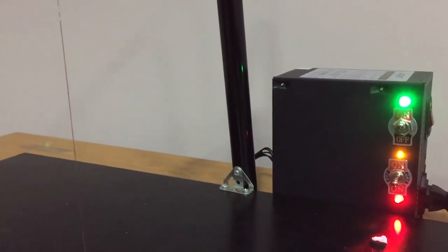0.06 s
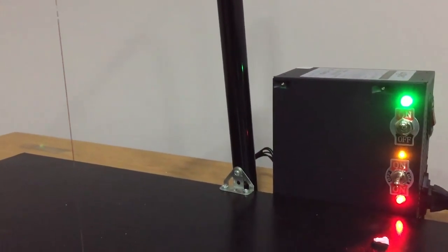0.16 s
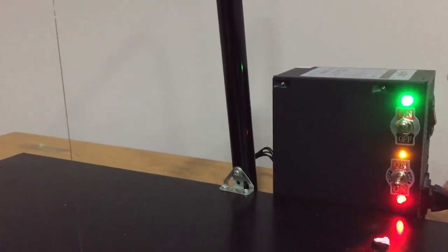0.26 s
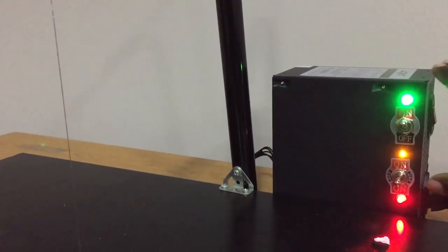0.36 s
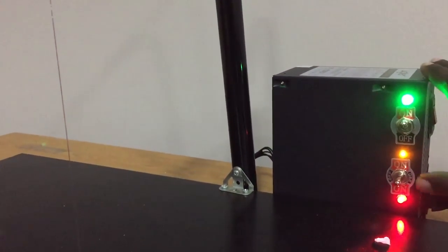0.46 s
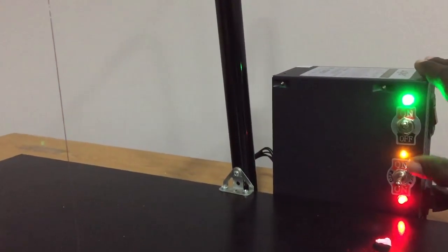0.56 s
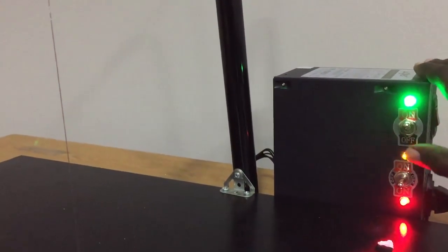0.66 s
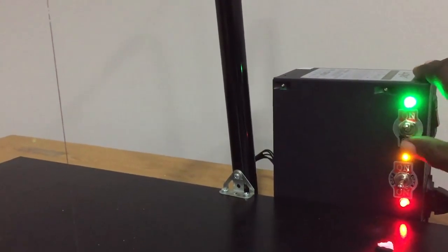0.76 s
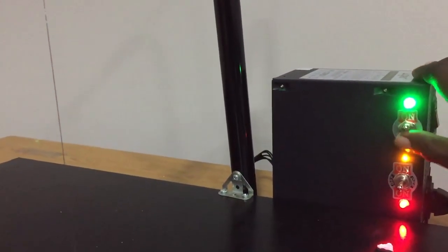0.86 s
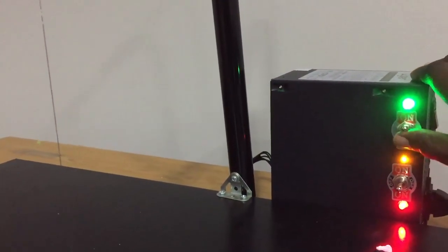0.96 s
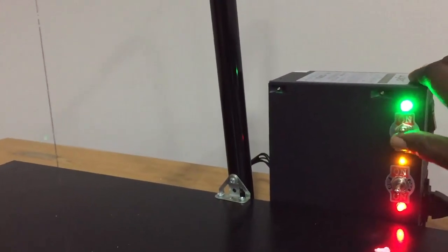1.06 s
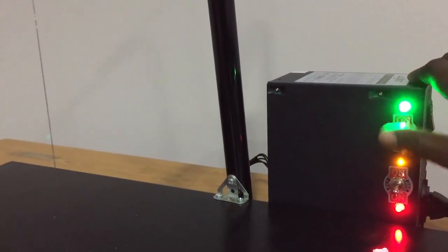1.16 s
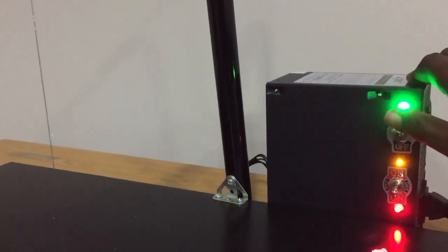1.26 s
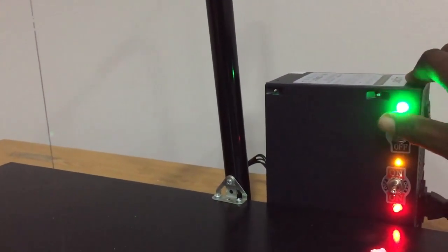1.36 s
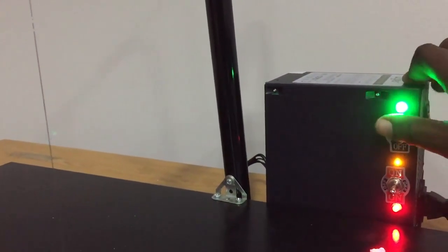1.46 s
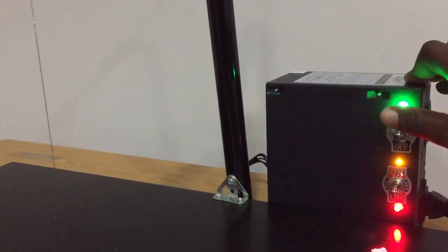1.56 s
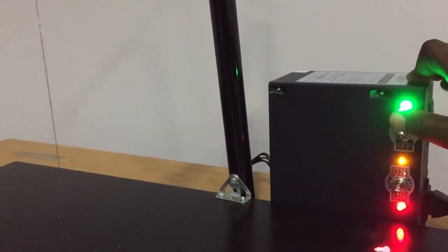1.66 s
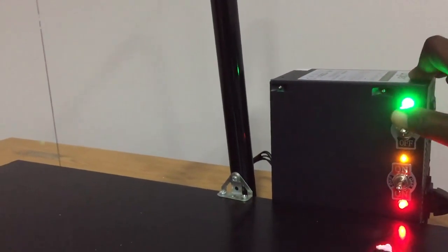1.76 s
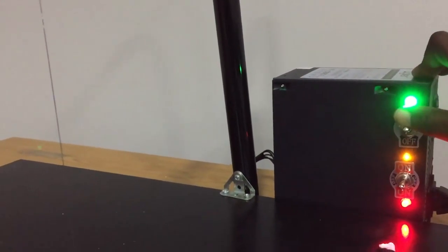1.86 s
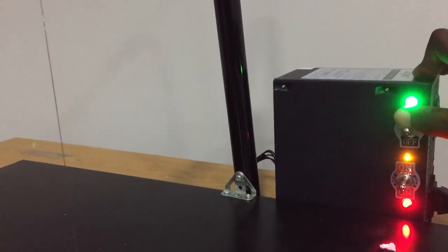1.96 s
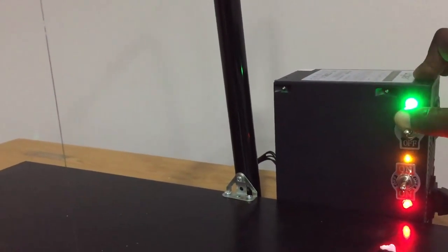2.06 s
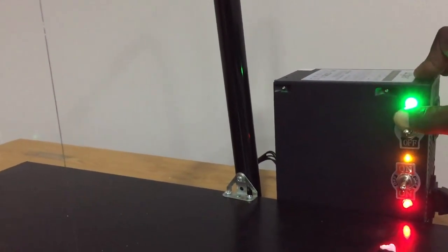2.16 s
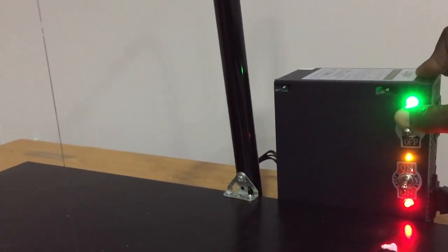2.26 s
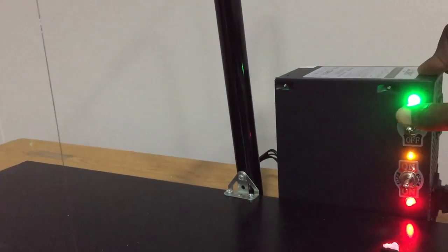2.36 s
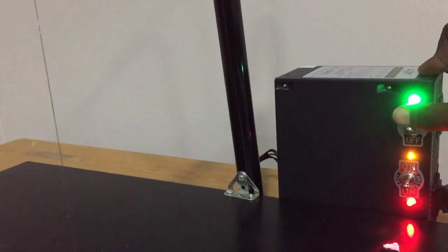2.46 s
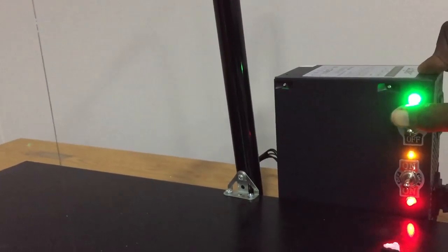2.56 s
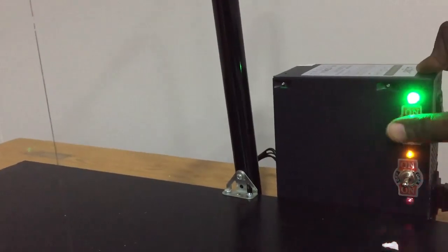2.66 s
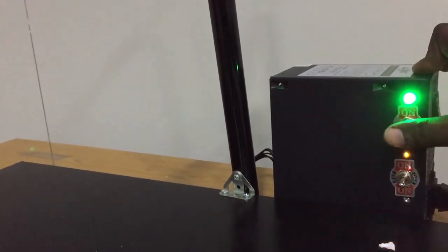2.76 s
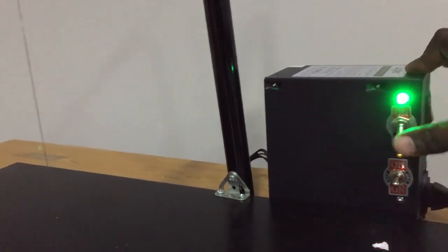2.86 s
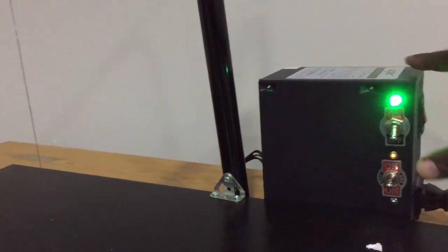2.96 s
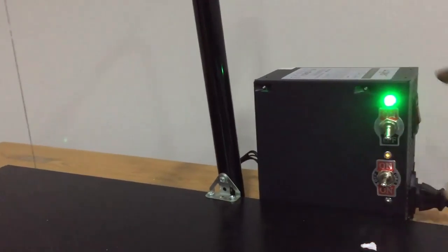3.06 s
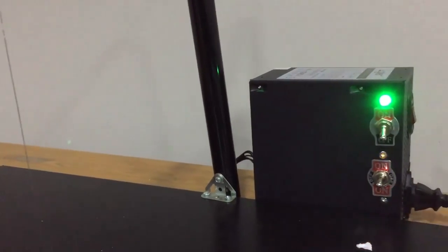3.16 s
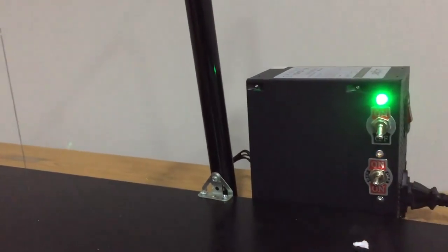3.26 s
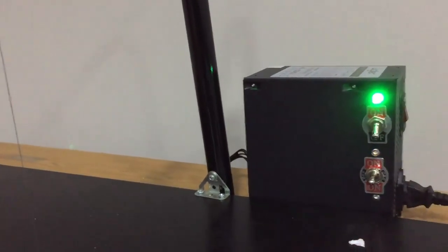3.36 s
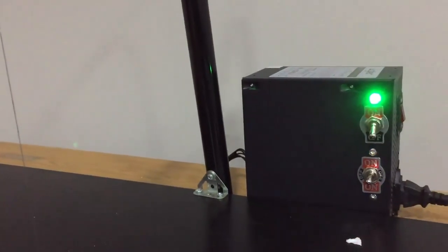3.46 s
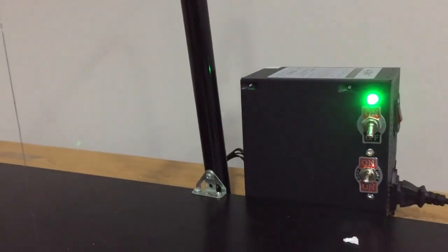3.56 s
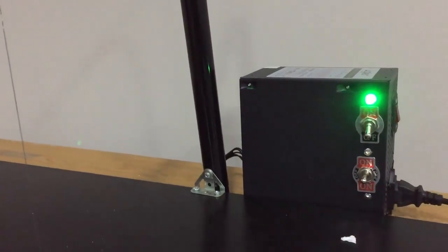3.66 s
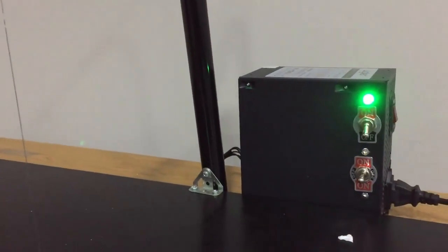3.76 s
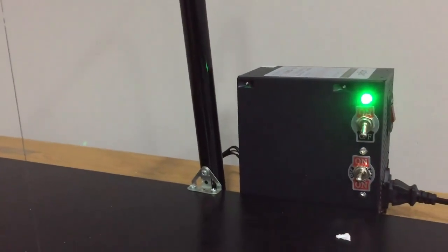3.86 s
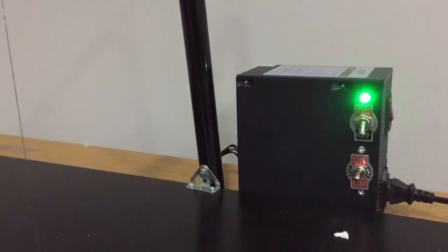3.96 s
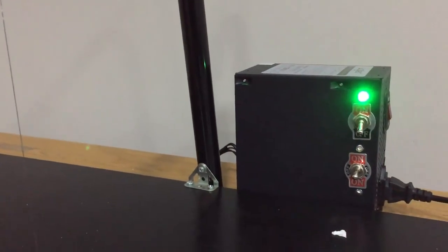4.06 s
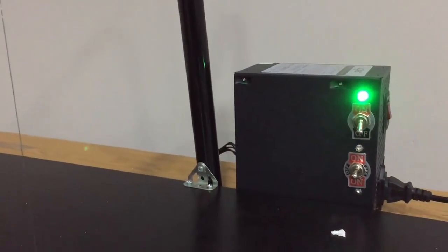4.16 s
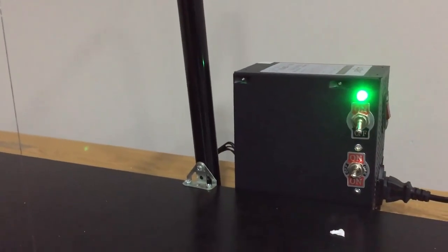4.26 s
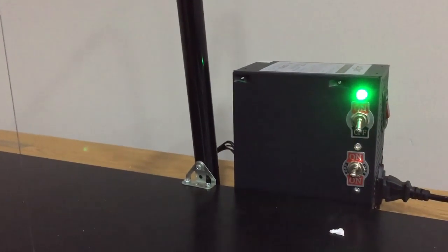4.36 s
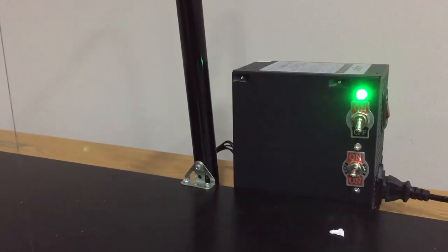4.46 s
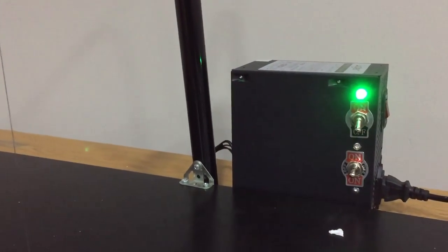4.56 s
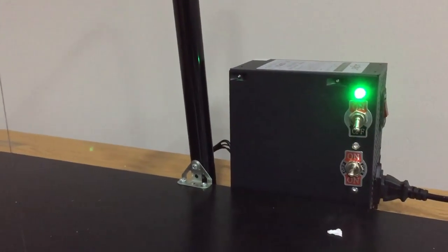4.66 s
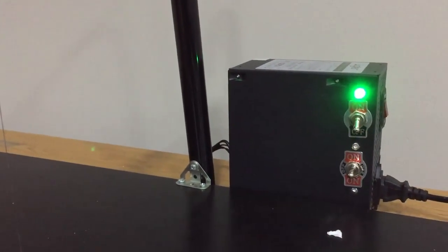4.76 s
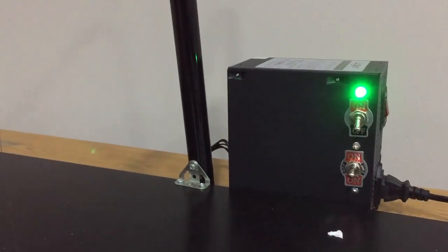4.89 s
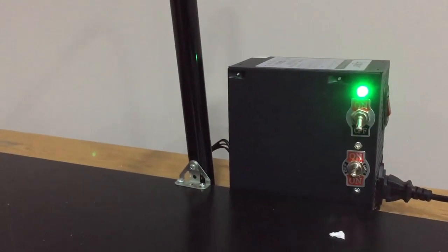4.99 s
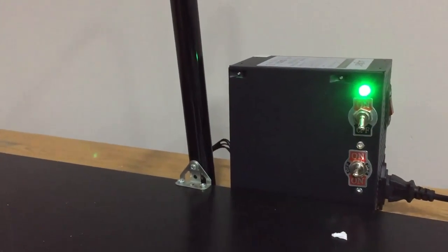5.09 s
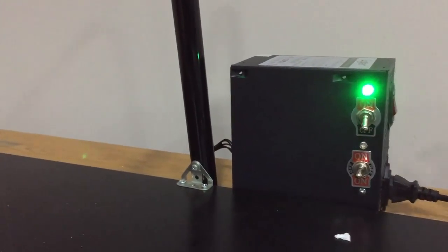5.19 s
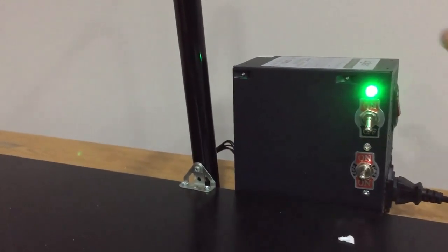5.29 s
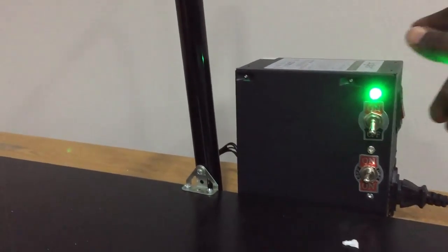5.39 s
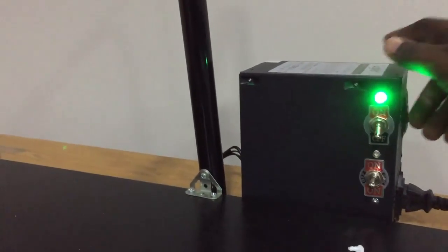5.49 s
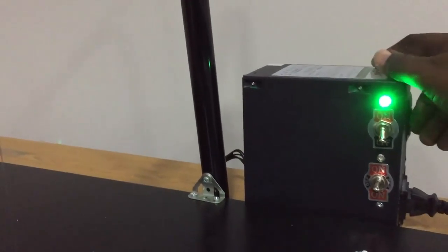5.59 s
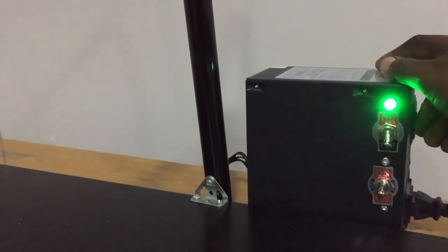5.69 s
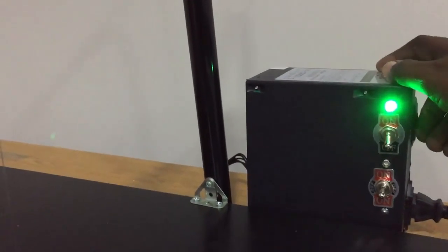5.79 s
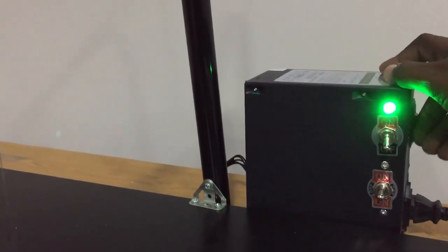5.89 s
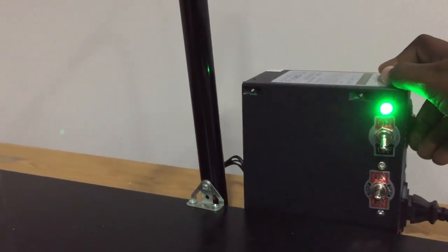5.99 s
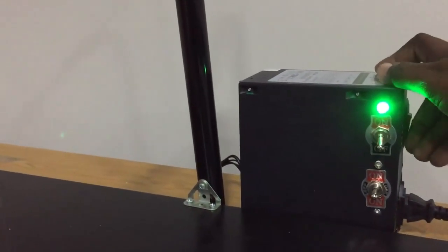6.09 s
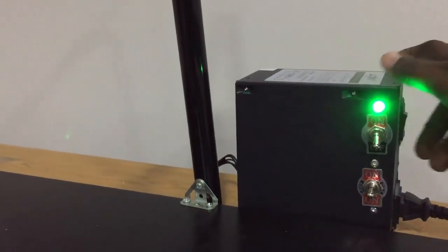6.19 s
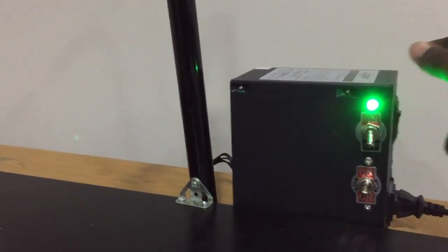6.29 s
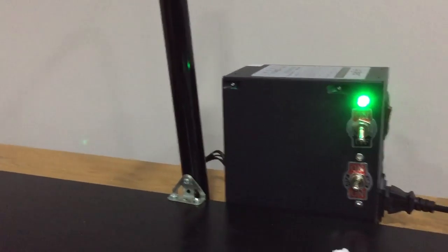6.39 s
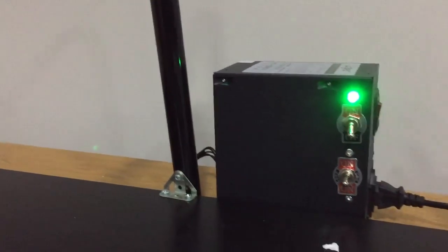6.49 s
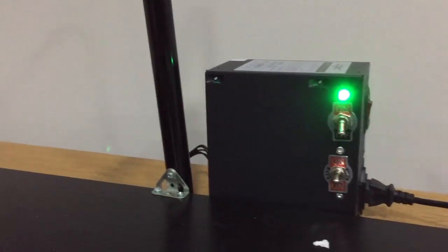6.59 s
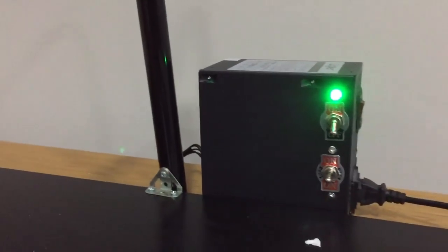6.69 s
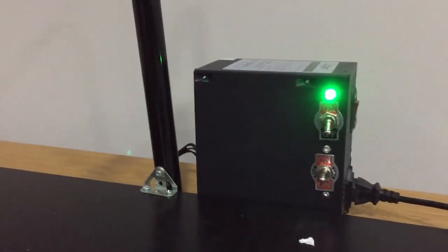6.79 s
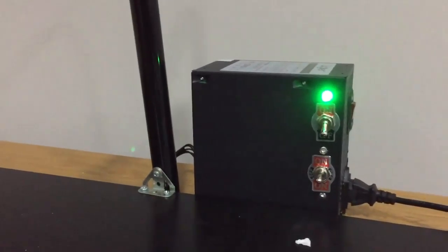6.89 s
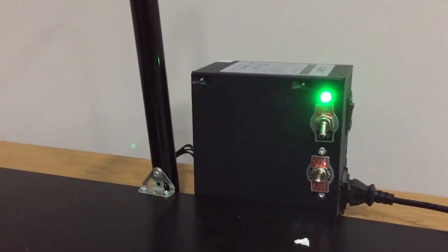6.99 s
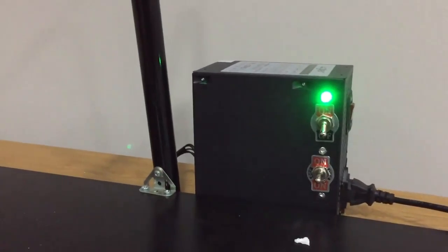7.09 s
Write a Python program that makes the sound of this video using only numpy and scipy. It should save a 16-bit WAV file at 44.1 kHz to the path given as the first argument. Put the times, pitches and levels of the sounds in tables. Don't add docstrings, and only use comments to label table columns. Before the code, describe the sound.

Close phone microphone in a bare, reverberant room. A small metal power supply's fan whirs faintly over mains hum, hiss and low rumble while a fingertip scrapes and sticks on the case. A nail ticks lightly, then a toggle snaps with a loud, bright metallic crack, a small desk boom and a long echo. The fan fades away. After a quiet stretch, light finger bumps precede a second, softer rocker click.

```python
import sys
import numpy as np
from scipy import signal
from scipy.fft import rfft, irfft, next_fast_len
from scipy.io import wavfile
from scipy.ndimage import uniform_filter1d

SR = 44100
rng = np.random.default_rng(int(sys.argv[2]) if len(sys.argv) > 2 else 0)


def nominal_scale(level):
    x = np.asarray(level, float) / 20
    return 10 ** x


def store_pcm(level_fs):
    pcm = np.round(np.clip(level_fs, -1, 1) * 32767).astype(np.int16)
    wavfile.write(sys.argv[1], SR, np.atleast_2d(pcm).T)


N = 314863
FAN_OFF_S = 2.742


def evened(x):
    return x / np.sqrt(np.mean(x ** 2) + 1e-20)


def drift(size, smooth):
    return evened(uniform_filter1d(rng.standard_normal(size), size=smooth))


def lumps(shape, over_time, over_pitch):
    x = uniform_filter1d(rng.standard_normal(shape), size=over_time)
    return evened(uniform_filter1d(x, size=over_pitch, axis=0))


def read(points, hz):
    f, value = np.transpose(points)
    return np.interp(np.log(hz + 1), np.log(f + 1), value)


def curve(rows, outside_db=-120):
    s, *columns = np.transpose(rows)
    t = np.arange(N) / SR
    live = uniform_filter1d(((t >= s[0]) & (t <= s[-1])) + nominal_scale(outside_db), size=800)
    return live, *(np.interp(t, s, c) for c in columns)


def add(mix, s, sound):
    part = mix[round(s * SR):][:len(sound)]
    part += sound[:len(part)]


def coloured(points, size, ridges=()):
    fast = next_fast_len(size)
    hz = np.fft.rfftfreq(fast, 1 / SR)
    lift_db = sum(db / (1 + (2 * (hz - f) / width) ** 2) for f, width, db in ridges)
    spectrum = rfft(rng.standard_normal(fast)) * nominal_scale(read(points, hz) + lift_db)
    return evened(irfft(spectrum, fast)[:size])


def patchy(x, patchy_db):
    z = signal.stft(x, nperseg=256)[2]
    z = z * nominal_scale(patchy_db * lumps(z.shape, over_time=14, over_pitch=6))
    return evened(signal.istft(z, nperseg=256)[1][:len(x)])


def resonate(x, hz, width):
    turn = np.exp(2j * np.pi * np.cumsum(hz * np.ones(len(x))) / SR)
    r = np.exp(-np.pi * width / SR)
    return 2 * (turn * signal.lfilter([1 - r], [1, -r], x / turn + 1e-18)).real


def as_modes(peaks, longer):
    return [(hz, db, longer * 2.2 / width) for hz, width, db in peaks]


def ring(modes, rise_s, split=0.015, twin_db=-4, scatter=1):
    t = np.arange(SR // 4) / SR
    twins = [(hz * (1 + split * rng.uniform(-1, 1)), db + twin_db, t60 / 2) for hz, db, t60 in modes]
    x = np.zeros(len(t))
    for hz, db, t60 in modes + twins:
        x += nominal_scale(db - 60 * t / t60) * np.sin(2 * np.pi * (hz * t + scatter * rng.random()))
    x = x * (1 - np.exp(-t / rise_s))
    return x / abs(x).max()


def crack(points, t60, rise_s=0.000079):
    t = np.arange(2048) / SR
    shape = (1 - np.exp(-t / rise_s)) * nominal_scale(-60 * t / t60)
    colour = nominal_scale(read(points, np.fft.rfftfreq(2048, 1 / SR)))
    x = rng.standard_normal(2048) * shape
    for _ in range(3):
        z = rfft(x)
        x = irfft(z / abs(z) * colour)
        x = x * shape / np.sqrt(uniform_filter1d(x ** 2, size=40) + 1e-12)
    return x / abs(x).max()


# pitch_hz, t60_s
ROOM_DECAY = [(100, 1.5), (250, 0.63), (600, 1.2), (1400, 1.495), (2500, 1.3), (5000, 1.2), (8000, .85),
              (11000, 0.68), (15000, 0.69)]


def tail(points, ridges, bend_s):
    build_s, flutter_db = 0.0018, 0.76
    hz, t, z = signal.stft(coloured(points, size=SR, ridges=ridges), SR, nperseg=256)
    fall_db = -45 * t * (1 + t / bend_s) / read(ROOM_DECAY, hz)[:, None]
    flutter = flutter_db * lumps(z.shape, over_time=4, over_pitch=12)
    x = signal.istft(z * nominal_scale(fall_db + flutter), SR, nperseg=256)[1]
    return x * (1 - np.exp(-(np.arange(len(x)) / SR / build_s) ** 2))


def switch(strikes, colour, modes, returned):
    out = np.zeros(N)
    for s, crack_db, ring_db, t60 in strikes:
        add(out, s, nominal_scale(crack_db) * crack(colour, t60))
        add(out, s, nominal_scale(ring_db) * ring(modes, 0.001))
    add(out, strikes[1][0], returned)
    return out


# start_s, crack_db, ring_db, crack_t60_s
TOGGLE_STRIKES = [
    (2.742, -16, -23, 0.075),
    (2.744, -6, -21, 0.016),
    (2.7455, -4.5, -28, 0.018),
    (2.7466, -9.5, -9, 0.012),
]
# pitch_hz, level_db
TOGGLE_CRACK = [(710, -28.5), (1200, 0.5), (2730, -5), (4360, 0), (5840, -3.5), (6870, -1), (8440, -14),
                (9610, -0.5), (10600, -10.5), (13200, -5.5), (14400, -7.5), (16000, -15.5)]
# pitch_hz, width_hz, level_db
TOGGLE_RING = [(187.5, 21, -5), (399.4, 16, -5), (691, 25, 3.5), (838, 23, -6.5), (1000, 120, -1),
               (1134, 25, -6.5), (1270, 30, -7.5), (1686, 26, 3), (1849, 44, -20), (2040, 16, -11.5),
               (2470, 70, -3), (3240, 200, -4.5)]
# pitch_hz, level_db, t60_s
TOGGLE_THUMP = [(1022, 9.5, 0.023), (1340, 2.5, 0.018), (610, -8.5, 0.028), (240.6, -2.5, 0.11)]


def toggle(returned):
    modes = as_modes(TOGGLE_RING, 1.0) + TOGGLE_THUMP
    return switch(TOGGLE_STRIKES, TOGGLE_CRACK, modes, returned)


# pitch_hz, level_db, t60_s
DESK = [(55, 0, .5), (73, -5.5, .3), (98, -1, .35), (127, -2.5, .3), (200, 2, 0.032)]
# pitch_hz, level_db, t60_s
TOGGLE_STOP = [(957, -1, 0.025), (1260, 1, .024), (686, -12, .045), (404, -5, 0.03), (2120, -8, .016),
               (2450, -4, .031), (3348, -7, 0.022), (1687, -10, 0.036)]


def toggle_knock():
    out = np.zeros(N)
    boom = ring([(hz, db, 2 * t60) for hz, db, t60 in DESK], 0.004)
    boom = boom * np.hanning(SR // 2)[-(SR // 4):]
    add(out, TOGGLE_STRIKES[0][0], nominal_scale(-36.5) * boom)
    add(out, TOGGLE_STRIKES[3][0] + 0.0003, nominal_scale(-10) * ring(TOGGLE_STOP, 0.0005, scatter=0.18))
    return out


# pitch_hz, level_db
TOGGLE_TAIL = [(50, -35), (100, -13), (200, -1.5), (300, -11), (600, -17.5), (1200, -16), (2500, -17.5),
               (2800, -22.5), (4400, -25.5), (5000, -30), (7000, -24.5), (7600, -28.5), (14500, -31.5),
               (16000, -40.5)]
# pitch_hz, width_hz, lift_db
TOGGLE_RIDGES = [(193.4, 90, 2.5), (363.9, 22, 11), (625, 78, 9), (1006, 130, 6), (1270, 120, 4),
                 (840, 25, 4.5), (1290, 25, 5), (1450, 20, 6.5), (2259.5, 30, 4), (1060, 23, 5),
                 (2920, 43, 4), (3281, 33, 4.5), (1690, 54, 10), (1900, 49, 3), (2450, 240, 5.5),
                 (4300, 450, 3.5), (6682, 350, 4.5), (10450, 500, -5.5)]


def toggle_echo():
    return nominal_scale(-31) * tail(TOGGLE_TAIL, TOGGLE_RIDGES, bend_s=1.3)


# start_s, crack_db, ring_db, crack_t60_s
ROCKER_STRIKES = [
    (6.0471, -57, -47.5, 0.043),
    (6.0553, -12, -42.5, 0.018),
    (6.0564, -11, -38, 0.018),
    (6.058, -11.5, -20, 0.015),
]
# pitch_hz, level_db
ROCKER_CRACK = [(180, -48.5), (300, -15.5), (762, -18.5), (1810, -8), (2360, -24.5), (3030, -3),
                (4230, -8.5), (6000, -6), (7820, -10.5), (10600, -8.5), (11900, -9), (14000, -3.5),
                (16000, -15)]
# pitch_hz, width_hz, level_db
ROCKER_RING = [(380, 19, -8.5), (679, 28, 1.5), (964, 24, 1), (1274, 65, -2.5), (1645, 37, 1.5),
               (1950, 95, -0.5), (2260, 47.2, -10.5), (2420, 40, -12.5), (2670, 30, -15), (3410, 99, -1.5),
               (3660, 58, -4), (4100, 60, -8)]
# pitch_hz, level_db, t60_s
ROCKER_THUMP = [(297, -1, 0.016), (882, -9.5, 0.017), (1143, -2, 0.031), (1430, -5, 0.02)]
# pitch_hz, level_db, t60_s
ROCKER_SNAP = [(3157, 0.5, 0.014), (2850, -1, 0.011), (3834, -1, 0.014), (5060, -12.5, .01),
               (6000, -8.5, 0.015), (6830, -5, 0.025), (14360, -13, .007)]


def rocker(returned):
    modes = as_modes(ROCKER_RING, 0.97) + ROCKER_THUMP
    out = switch(ROCKER_STRIKES, ROCKER_CRACK, modes, returned)
    add(out, ROCKER_STRIKES[1][0], nominal_scale(-12) * ring(ROCKER_SNAP, 0.000402))
    return out


# pitch_hz, level_db, t60_s
ROCKER_REBOUND = [(1962, -8, 0.027), (3420, -5, .022), (5180, -9, 0.016), (5970, -3, .012),
                  (7570, -5, .012), (8460, -1.5, 0.015), (13893, -2, .01), (15050, -2, .01),
                  (3730, -3, .02)]


def rocker_rebound():
    out = np.zeros(N)
    add(out, ROCKER_STRIKES[2][0], nominal_scale(-14) * ring(ROCKER_REBOUND, 0.0003, twin_db=-13))
    return out


# pitch_hz, level_db
ROCKER_TAIL = [(50, -44.5), (110, -9), (220, -11), (500, -18.5), (800, -19), (1600, -14), (2400, -12.5),
               (2700, -8.5), (3900, -13.5), (4300, -20.5), (5400, -16.5), (7500, -14), (12800, -15),
               (16000, -21.5)]
# pitch_hz, width_hz, lift_db
ROCKER_RIDGES = [(219.46, 30, 11), (392, 46, 10.7), (667, 59, 11.7), (963, 70, 5.8), (1654, 110, 9.3),
                 (2558, 81, 4.3), (3050, 72, 3.01), (3440, 98, 8), (5760, 555, 4.9), (7000, 200, 5.2),
                 (7950, 180, 4)]


def rocker_echo():
    return nominal_scale(-40) * tail(ROCKER_TAIL, ROCKER_RIDGES, bend_s=0.63)


# start_s, crack_db, ring_db, crack_t60_s
NAIL_STRIKES = [
    (1.4388, -31, -54.5, 0.026),
    (1.4399, -35, -30.5, 0.019),
    (1.597, -72, -49, 0.073),
]
# pitch_hz, level_db
NAIL_CRACK = [(180, -30), (300, -18.5), (1010, -1), (1510, -8), (1750, -0.5), (2790, -1.5), (3350, 1),
              (3700, -8), (5700, -10), (16000, -44)]
# pitch_hz, level_db, t60_s
NAIL_RING = [(379, -1.5, 0.12), (560, -14, 0.02), (677, 0.5, 0.075), (830, -11, 0.04), (975, 2, 0.074),
             (1306, -1.5, 0.071), (1722, -5, 0.083), (2150, -7, 0.052), (2330, -7, 0.039),
             (2580, -8, 0.037), (3330, 2.5, 0.035)]
# start_s, crack_db, ring_db, crack_t60_s
LET_GO_STRIKES = [
    (2.9495, -34, -70, 0.016),
    (2.9515, -30, -71, .02),
]
# pitch_hz, level_db
LET_GO_CRACK = [(1500, -30), (2050, 5), (2700, 11), (3300, 8), (3900, -1), (6000, -3), (8000, -21),
                (16000, -23)]


def lever_touches(returned):
    nail = switch(NAIL_STRIKES, NAIL_CRACK, NAIL_RING, returned)
    let_go = switch(LET_GO_STRIKES, LET_GO_CRACK, NAIL_RING, returned)
    return nail + let_go


def nail_echo():
    return nominal_scale(-62) * tail(NAIL_CRACK, (), bend_s=0.19)


# start_s, level_db, moved (0 on the lid, 1 on the lever plate)
SLIDE = [
    (0, -59.5, 0.084),
    (.22, -61.5, 0),
    (.3, -51.5, 0.516),
    (.35, -64.5, 0.76),
    (.368, -56, 0.55),
    (.4, -63, .55),
    (.455, -56.5, 0.48),
    (.466, -71.5, 0.72),
    (.6, -80, 1),
]
# pitch_hz, level_db
LID_HISS = [(900, -8), (1300, -3.5), (1700, -23), (2600, -13.5), (3400, -25), (4000, -3), (4900, -9.5),
            (5400, -9), (7400, -4), (8200, -9.5), (10700, -17), (12500, -14), (15000, -9.5), (16000, -24.5)]
# pitch_hz, width_hz, lift_db
LID = [(1347, 76, 6.5), (2624, 72, 15), (3250, 45, 17), (4120, 280, 4), (5380, 300, 6), (6150, 120, 5),
       (6818, 170, 9.5), (7390, 140, 1), (9240, 250, 8), (13780, 270, -1), (15200, 440, 5)]
# pitch_hz, level_db
PLATE_HISS = [(1290, -49), (2200, -11), (2850, -12), (3360, 5.5), (3650, 0), (4130, -3), (5050, -9),
              (6860, -24), (9330, -12.5), (16000, -20)]
# start_s, peak_db, upper_ring_db, length_s
SLIPS = [(0.229, -50, -3, 0.0043), (0.244, -36.5, -1, 0.0044), (0.258, -38, -8, 0.0034),
         (0.2654, -34, -3, 0.0047), (0.2837, -31, 1, 0.0048), (0.297, -30, 1.5, 0.004),
         (0.315, -50, 3, .004), (0.324, -44, 3, .004), (0.336, -41, 0.5, 0.0047), (0.368, -37.5, 1.5, .003),
         (0.3764, -37.5, 0.5, 0.0058), (0.441, -35, -7, 0.003), (0.445, -48, -3, 0.0043)]
# pitch_hz, width_hz, level_db
LEVER = [(3450, 200, -2), (3780, 760, 3.5), (6640, 570, -8.5), (8000, 770, -2), (10300, 2600, -9.5),
         (13500, 4000, -21)]


def slide():
    live, db, moved = curve(SLIDE)
    grain = nominal_scale(drift(N, 60))
    uneven = 0.063 * drift(N, 900) * (moved < 0.5)
    moved = np.clip(moved + uneven, 0, 1)
    lid = patchy(coloured(LID_HISS, size=N, ridges=LID), patchy_db=2.0)
    plate = coloured(PLATE_HISS, size=N)
    out = live * nominal_scale(db) * evened(grain) * (np.sqrt(1 - moved) * lid + np.sqrt(moved) * plate)
    t = np.arange(900) / SR
    for s, peak_db, upper_db, length in SLIPS:
        puff = rng.standard_normal(900) * (1 - np.exp(-t / 0.00055)) * np.exp(-(t / length) ** 2)
        slip = np.zeros(900)
        for k, (hz, width, level_db) in enumerate(LEVER):
            mode = resonate(resonate(puff, hz, width), hz, width) / np.sqrt(width)
            slip += nominal_scale(level_db + upper_db * (k > 1)) * mode
        add(out, s, nominal_scale(peak_db - 4) * slip / abs(slip).max())
    return out


# start_s, peak_db, pitch_hz, t60_s, overtones_db
BUMPS = [
    (0.858, -54, 640, 0.065, -16),
    (1.609, -47.5, 455, 0.21, -1),
    (2.363, -48.5, 464, 0.16, -10),
    (2.55, -49.5, 239, 0.2, 3),
    (2.884, -37, 446, 0.083, -19),
    (5.734, -46, 183, 0.063, -20),
    (5.967, -48, 211.8, 0.05, -12),
]
# pitch_ratio, level_db, decay_share
BUMP_OVERTONES = [(1.45, 0, .6), (2.15, -2, .5), (2.7, -4, .4)]
# start_s, peak_db
THUDS = [
    (0.926, -38),
    (5.921, -39),
]
# pitch_hz, level_db, t60_s
THUD = [(257, 1.5, 0.044), (337, 0.5, 0.046), (650, -4, 0.044), (980, -14, .03)]
# start_s, peak_db, pitch_hz, t60_s
PINGS = [
    (5.706, -62, 1750, 0.042),
    (5.7765, -53.5, 2237, 0.067),
    (5.777, -65, 4390, .035),
    (5.778, -66, 6500, .04),
    (5.891, -57, 1767, 0.04),
    (5.733, -64, 800, .05),
]


def bumps():
    out = np.zeros(N)
    for s, peak_db, hz, t60, over_db in BUMPS:
        overtones = [(k * hz, over_db + d, share * t60) for k, d, share in BUMP_OVERTONES]
        add(out, s, nominal_scale(peak_db) * ring([(hz, 0, t60)] + overtones, 0.0024, scatter=0.15))
    for s, peak_db in THUDS:
        add(out, s, nominal_scale(peak_db) * ring(THUD, 0.0011, twin_db=-20, scatter=0))
    for s, peak_db, hz, t60 in PINGS:
        add(out, s, nominal_scale(peak_db - 3) * ring([(hz, 0, t60), (hz + 820, -9, t60 / 2)], 0.0029))
    return out


# start_s, length_s, level_db, low_edge_hz,
# fall_db_per_octave
RUBS = [(.1121, .021, -68.2, 8510, 1.6), (1.4381, .0061, -58.5, 5010, 2.6), (1.5821, 0.0371, -69, 501, 3.2),
        (1.5901, 0.034, -71.5, 2710, .9), (1.9801, 0.109, -72.5, 1910, 2.6),
        (2.0101, .061, -77, 11510, 1.6), (2.1781, .051, -78.5, 6010, 3.2), (2.7321, .0121, -58, 610, 3),
        (2.7501, 0.0071, -51, 910, 8), (2.9441, .0241, -59.5, 9010, 1.6), (2.9481, .0101, -48.5, 3510, 5.1),
        (3.3921, 0.024, -69.5, 2810, 3), (5.651, 0.45, -75.5, 501, 6.1), (5.7731, 0.0141, -71, 11510, 1.6),
        (5.7741, 0.0131, -71, 2610, 6.1), (5.7861, 0.0151, -72.5, 11510, 1.6),
        (5.8861, .0081, -66, 2310, 18), (5.9201, .091, -71, 181, 7), (6.0061, 0.0121, -71, 3010, 5.1),
        (6.0261, 0.0281, -66, 1510, 6.1), (6.0516, .0051, -46.5, 10510, 1.6),
        (6.2001, 0.0075, -67.5, 1210, 3.2)]


def rubs():
    out = np.zeros(N)
    for s, length, level_db, edge_hz, fall_db in RUBS:
        colour = [(edge_hz * 0.7, -30), (edge_hz, 0), (16000, -fall_db * np.log2(16000 / edge_hz))]
        rub = coloured(colour, size=round(length * SR))
        add(out, s, nominal_scale(level_db) * rub * signal.windows.tukey(len(rub), 0.6))
    return out


# start_s, length_s, level_db, pitch_hz, end_pitch_ratio
SQUEAKS = [(2.001, .081, -79, 8551, 1.002), (2.9481, .0081, -39.5, 2151, 1.56),
           (3.4121, .018, -76.5, 8751, .991), (3.3971, .0121, -70.5, 5701, 1.002),
           (5.7701, .0101, -73, 2151, 1.031), (5.8951, .026, -69, 1851, .881),
           (5.9951, .031, -75, 3151, 1.002), (6.0271, .029, -71, 8501, 1.002),
           (6.0401, .016, -66.5, 3101, 1.002), (.001, .051, -77, 2621, 1.002),
           (.151, .121, -73, 2621, 1.003), (.251, .111, -71.5, 2631, .991), (.011, .231, -72, 6811, .998),
           (.281, .121, -70, 3251, .981)]


def squeaks():
    out = np.zeros(N)
    for s, length, level_db, hz, ratio in SQUEAKS:
        glide = hz * np.linspace(1, ratio, round(length * SR))
        tone = np.sqrt(2) * np.sin(2 * np.pi * np.cumsum(glide) / SR)
        blur = evened(resonate(rng.standard_normal(len(glide)), glide, 250))
        add(out, s, nominal_scale(level_db) * (tone + 0.58 * blur) * np.hanning(len(glide)))
    return out


# pitch_hz, level_db
AIRFLOW = [(30, -30), (60, 3), (110, 5), (170, -3.5), (300, -6), (600, -3), (900, -5.5), (1300, -14.5),
           (2000, -20.5), (4000, -35), (9000, -70)]
# middle_s, depth (0-1), half_length_s
BREAKS = [(.071, .9, .03), (.156, .9, .018), (.221, .7, .012), (.291, .95, .018), (.371, .8, .025),
          (.46, .7, .014), (.535, .7, .014), (.611, .8, .02), (.691, .8, .018), (.791, .95, .025),
          (.835, .8, .013), (.901, .95, .015), (.981, .85, .03), (1.081, .85, .028), (1.155, .6, .012),
          (1.251, .85, .03), (1.34, .7, .014), (1.515, .85, .03), (1.65, .6, .02), (1.741, .75, .022),
          (1.85, .9, .033), (2.001, .95, .04), (2.121, .7, .012), (2.166, .95, .018), (2.26, .5, .012),
          (2.345, .85, .025), (2.451, .6, .02), (2.596, .95, .022)]


def fan():
    coast_s, air_db, gust_db = 0.52, -64, 2.5
    blade_hz, climb_hz_per_s = 589.5, 1.6
    blade_db, grows_db = -64.5, 2
    t = np.arange(N) / SR
    coast = np.exp(-np.maximum(t - FAN_OFF_S, 0) / coast_s)
    air = nominal_scale(air_db + gust_db * drift(N, 2500)) * coast * coloured(AIRFLOW, size=N)
    hz = blade_hz + climb_hz_per_s * t
    fuzz = evened(resonate(rng.standard_normal(N), hz, 30))
    coarse = t[::64]
    whole = np.ones(len(coarse))
    for s, depth, half in BREAKS:
        whole *= 1 - depth * np.exp(-((coarse - s) / half) ** 2)
    blade = np.sqrt(2) * np.sin(2 * np.pi * np.cumsum(hz) / SR) * np.interp(t, coarse, whole)
    level = (t < FAN_OFF_S) * nominal_scale(blade_db + grows_db * t / FAN_OFF_S)
    return air + level * (blade + 0.53 * fuzz)


def whine():
    start_s, end_s, rise_s, fall_s = 1.16, 2.35, 0.79, 0.28
    t = np.arange(N) / SR
    load = np.clip(np.minimum((t - start_s) / rise_s, (end_s - t) / fall_s), 0, 1) ** 0.5
    phase = 2 * np.pi * 3413 * t
    return load * nominal_scale(-78.5) * np.sqrt(2) * (np.sin(phase) + nominal_scale(-14) * np.sin(3.221 * phase))


# pitch_hz, level_db
HUM = [(119.6, -68.5), (179.4, -76.5), (239.3, -76), (358.8, -88)]


def hum():
    t = np.arange(N) / SR
    out = np.zeros(N)
    for hz, db in HUM:
        wobble = 1 + 0.45 * drift(N, 3000)
        out += nominal_scale(db) * np.sqrt(2) * wobble * np.sin(2 * np.pi * hz * t)
    return out


# pitch_hz, level_db
ROOM_TONE = [(150, -59.5), (200, -23.5), (270, -3.5), (350, -1.5), (400, -4.5), (750, -6), (1400, -8.5),
             (3800, -11.5), (4800, -14.5), (6500, -14.5), (8400, -18), (10400, -21), (11500, -20.5),
             (16000, -22.5)]
# pitch_hz, level_db
DRONE = [(70, -13.5), (95, -2.5), (130, 2), (155, -6), (185, -8), (215, -8), (245, -5), (300, -14.5),
         (400, -38), (600, -95)]


def room_tone():
    return nominal_scale(-71) * coloured(ROOM_TONE, size=N) + nominal_scale(-69.5) * coloured(DRONE, size=N)


# middle_s, level_db, pitch_hz
THROBS = [(.08, -65, 55), (.18, -54.5, 60.5), (0.291, -58, 55), (.53, -61, 62), (.91, -56.5, 71),
          (1.25, -55, 58), (1.38, -58, 55), (1.5, -57, 55), (1.62, -55.5, 65.5), (1.75, -57.5, 55),
          (1.928, -56.5, 58), (2.05, -55, 52.2), (2.31, -58.5, 65.3), (2.48, -71.5, 51.6),
          (3.03, -58.5, 55), (3.38, -62.5, 62), (3.591, -61, 55), (3.801, -59.5, 59.96), (4.16, -59, 52.1),
          (4.33, -60.5, 62), (4.64, -59.5, 55.6), (4.89, -57, 64), (5.12, -59, 58), (5.56, -57.5, 56),
          (5.989, -57, 55), (6.21, -62, 52.1), (6.46, -55, 62.4), (6.64, -57.5, 53.9), (6.979, -59, 55)]


def rumble():
    half_s = 0.035
    loose = [(26, -22.5), (38, -13.5), (48, -1), (60, -3), (80, -3), (105, -20.5), (200, -95.5)]  # Hz, dB
    out = nominal_scale(-66.5) * coloured(loose, size=N)
    t = np.arange(-0.12, 0.12, 1 / SR)
    for s, db, hz in THROBS:
        throb = nominal_scale(db) * np.sqrt(2) * np.exp(-(t / half_s) ** 2) * np.sin(2 * np.pi * hz * t)
        add(out, max(s + t[0], 0), throb[t + s >= 0])
    return out


def scene():
    after_toggle, after_rocker, after_nail = toggle_echo(), rocker_echo(), nail_echo()
    switches = toggle(after_toggle) + rocker(after_rocker) + lever_touches(after_nail) + toggle_knock()
    background = hum() + room_tone() + rumble()
    machine = fan() + whine()
    fingers = slide() + bumps() + rubs() + squeaks()
    return (switches + background + machine + fingers + rocker_rebound())[None]


def low_pass(x):
    return signal.sosfilt(signal.butter(12, 16630, fs=SR, output="sos"), x)


def record(dry):
    thin = signal.sosfilt(signal.butter(4, 38, "high", fs=SR, output="sos"), dry)
    edge = signal.firwin(401, 15900, window=("kaiser", 7), fs=SR)
    heard = signal.oaconvolve(thin, edge[None], "same")
    return low_pass(heard)


dry = scene()
out = record(dry)
store_pcm(out)
```